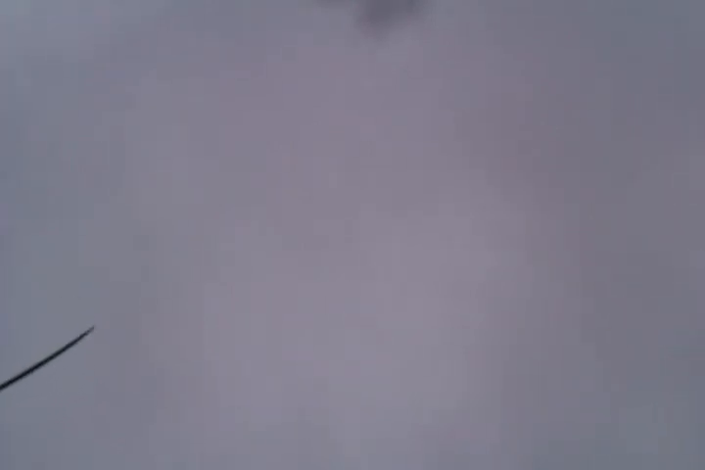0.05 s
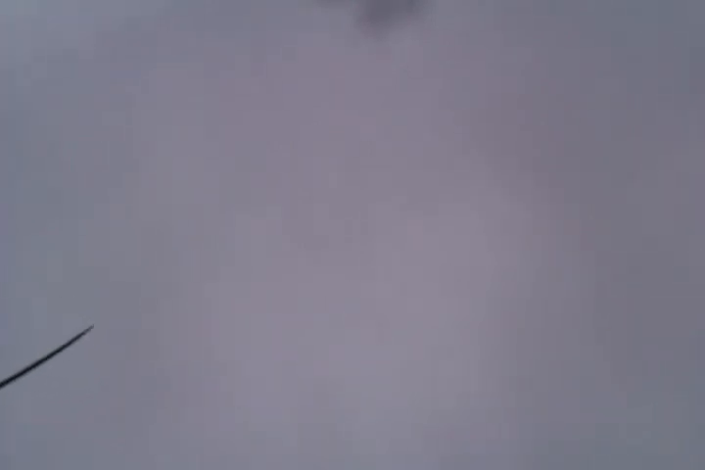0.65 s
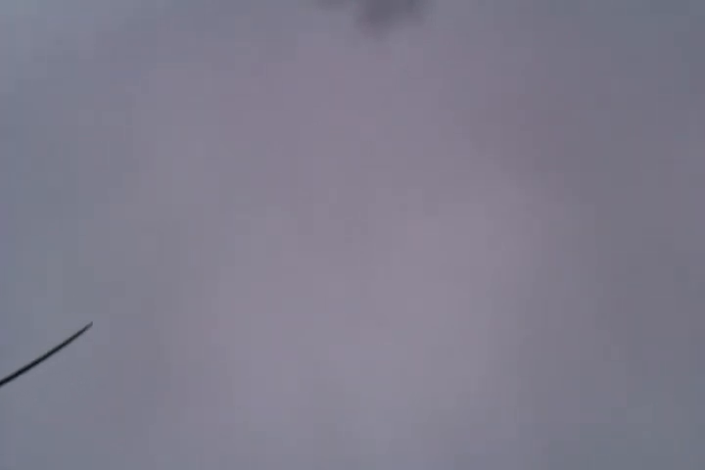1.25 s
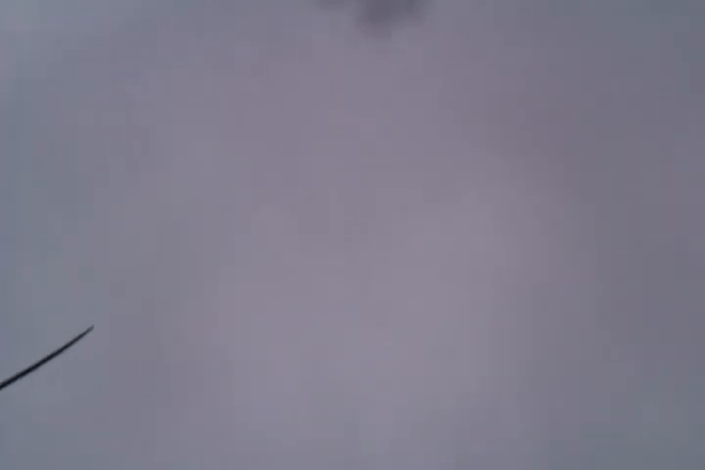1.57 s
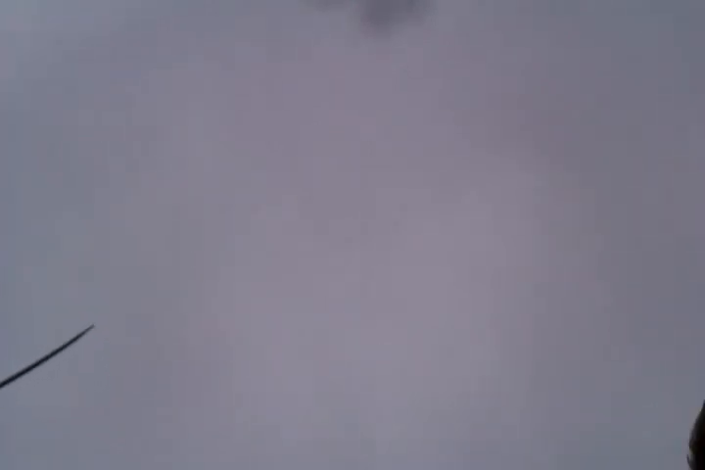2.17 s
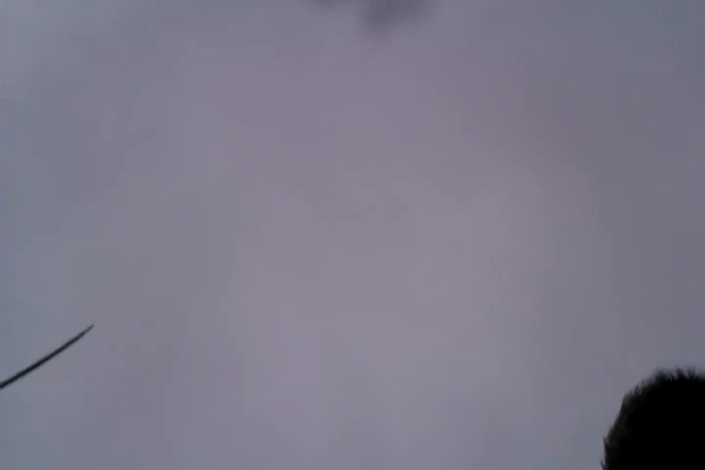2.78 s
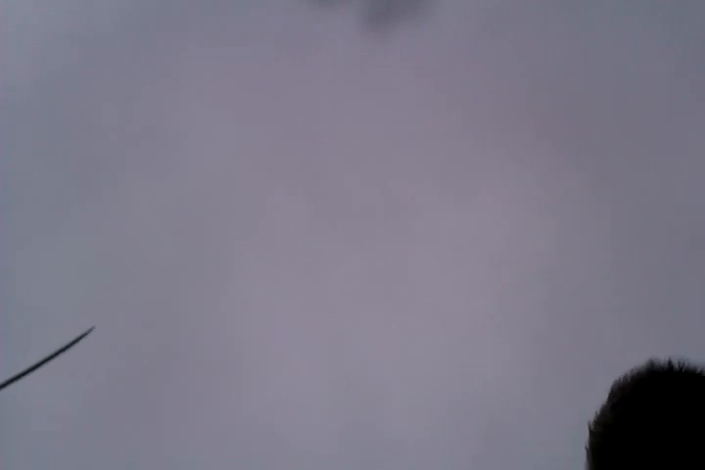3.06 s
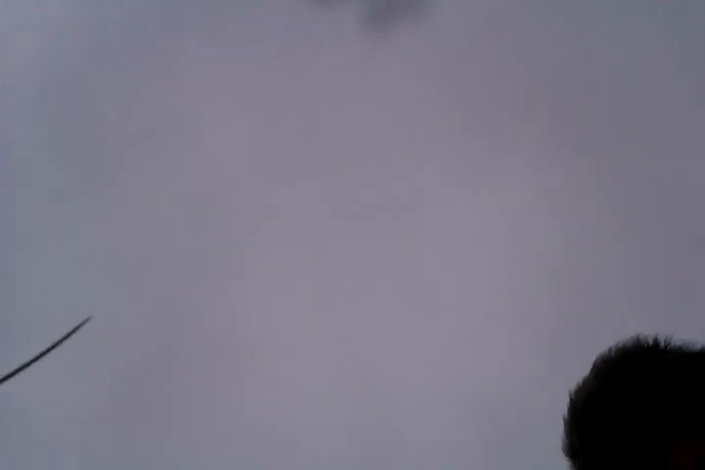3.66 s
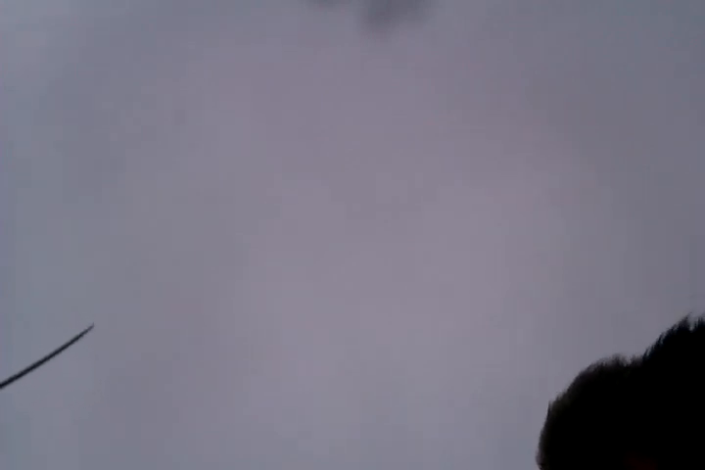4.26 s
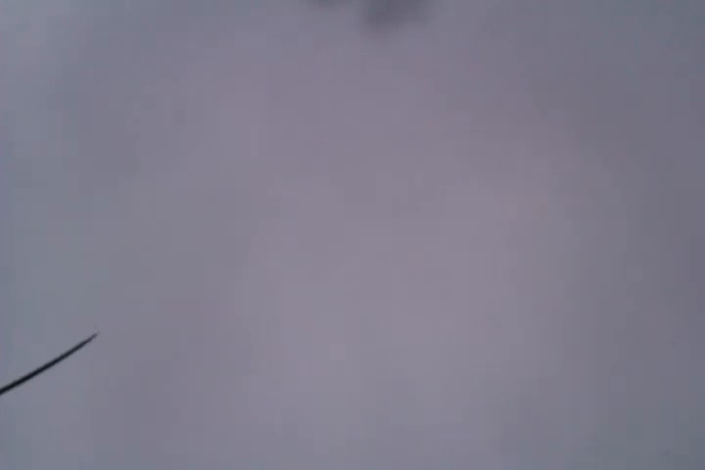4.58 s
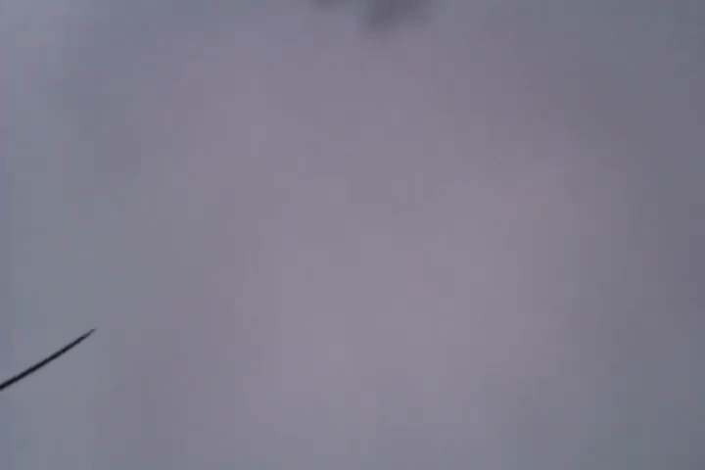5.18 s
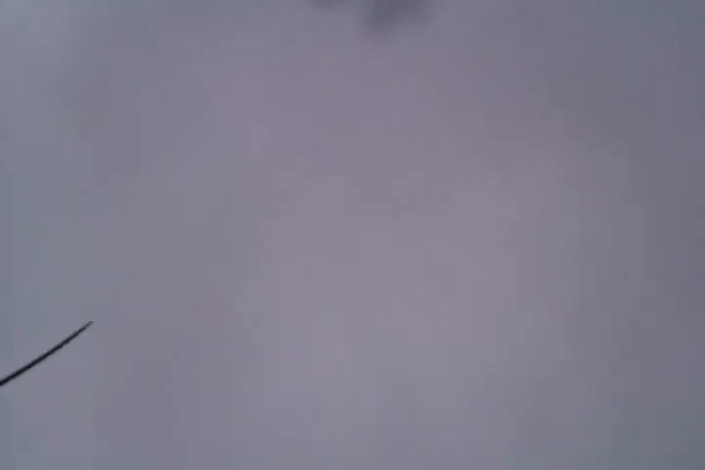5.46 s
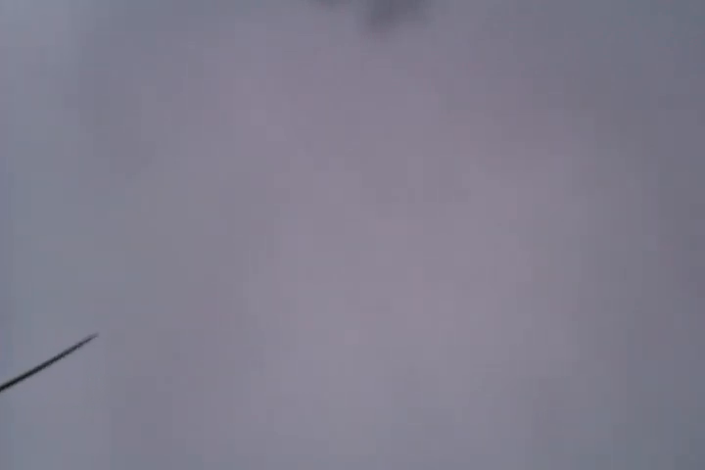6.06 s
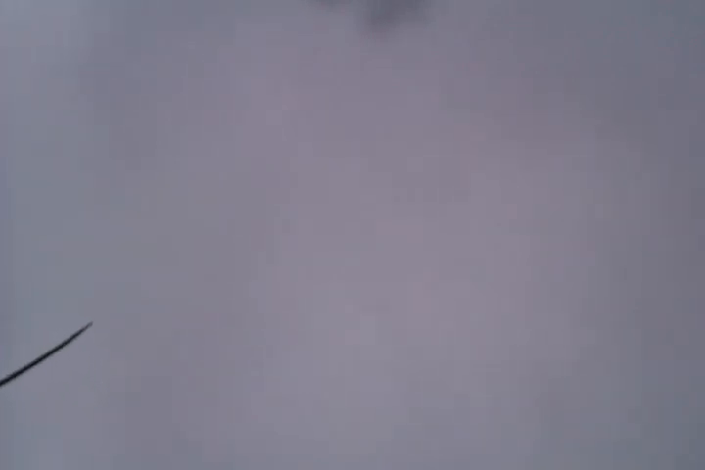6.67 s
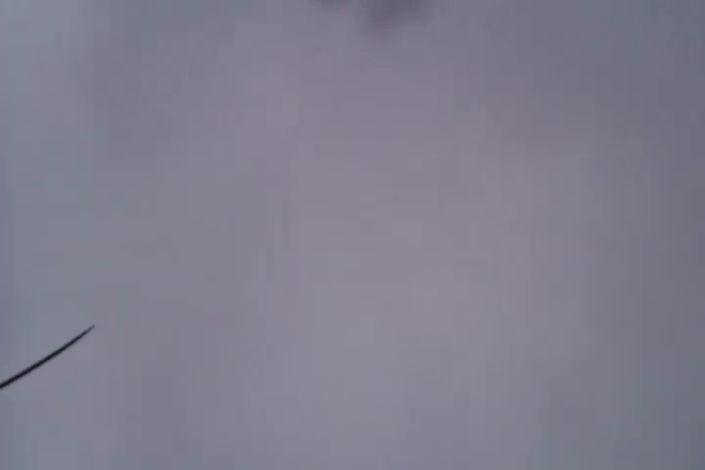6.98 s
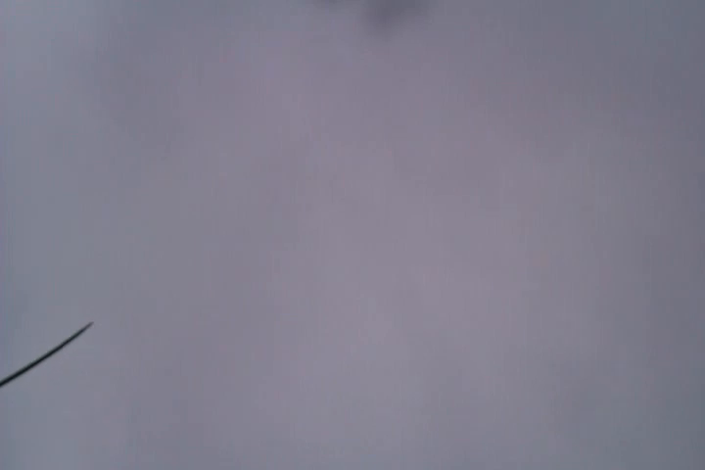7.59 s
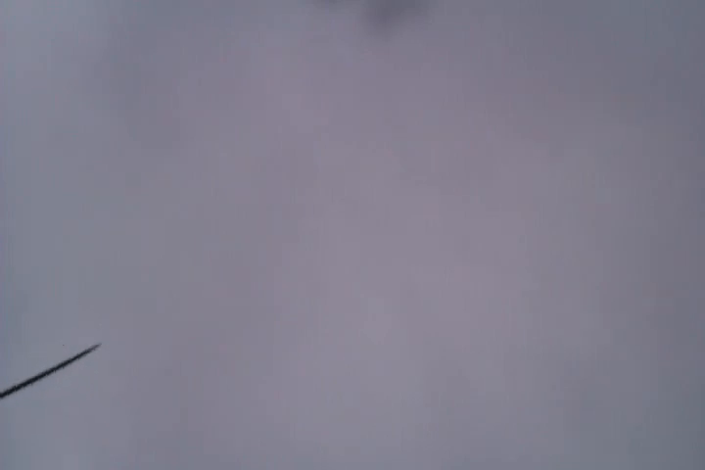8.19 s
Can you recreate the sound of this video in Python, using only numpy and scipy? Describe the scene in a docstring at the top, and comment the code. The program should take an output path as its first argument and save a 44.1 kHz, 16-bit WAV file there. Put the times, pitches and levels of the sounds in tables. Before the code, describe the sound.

A run of ten shrill, raspy animal screeches sounds very near the microphone in the open air, slightly distorted and separated by soft gasps. Each scoops up in pitch, catches on whistling notes and ends hoarse. A hand bumps the microphone now and then. The cries weaken and stop, leaving faint hiss, knocks, scuffs and wind that swells at the end. The whole sound has a fast electronic buzz.

```python
"""Outdoors, an animal starts screeching at once, close enough to overload the microphone.
For six seconds it cries ten times, its thin 2 kHz voice flipping between a pure whistle and a
chaotic rasp, with small gasps in between. From the fourth cry on, a hand knocks the camera.
After the last cry come more knocks, then the grip rubs and the rumbling wind rises at the end.
All the way through, the recorder stutters, which lays a fast buzz over everything."""
import sys
import numpy as np
from scipy import signal
from scipy.fft import rfft, irfft, next_fast_len
from scipy.io import wavfile
from scipy.ndimage import uniform_filter1d

SR = 44100
rng = np.random.default_rng(int(sys.argv[2]) if len(sys.argv) > 2 else 0)


def generate_wav(signal):
    """Clip the signal to [-1, 1] and save it as 16-bit WAV at the path in sys.argv[1]."""
    frames = np.transpose(np.atleast_2d(signal))
    scaled = np.clip(frames, -1, 1) * 32767
    pcm = np.round(scaled).astype(np.int16)
    wavfile.write(sys.argv[1], SR, pcm)


N = 367794
TIME = np.arange(N) / SR


def screech(edges_hz=(3000, 5100), hold_s=.045, flutter_db=1.5, flutter_hz=35.7):
    """The animal's voice: vocal folds drive the throat, and its low, middle and top bands shift in weight."""
    hz, rough, effort_db, middle_db, top_db = squeals(cries())
    rough = np.clip(rough, 0, 1)
    voice = throat(vocal_folds(hz, rough), hz)
    lowpasses = [signal.butter(6, edge, fs=SR, output="sos") for edge in edges_hz]
    low, below_top = [signal.sosfiltfilt(lowpass, voice) for lowpass in lowpasses]
    bands = np.array([low, below_top - low, voice - below_top])
    # steady lung pressure holds each band's strength even while the cycles scatter
    power = uniform_filter1d(bands ** 2, int(hold_s * SR), axis=1)
    bands /= np.sqrt(abs(power) + 1e-9)
    # in the rasp the energy flutters from one band to another
    flutter = flutter_db * np.sqrt(rough) * np.array([drift(flutter_hz) for _ in bands])
    weights = from_db(np.array([np.zeros(N), middle_db, top_db]) + flutter)
    voice = (bands * weights).sum(0) / np.linalg.norm(weights, axis=0)
    return voice * from_db(effort_db)


# The ten cries. Roughness runs from 0 (whistle) to 1 (rasp); middle and top compare with the low band.
# start/s, end/s, effort/dB, growth/dB, late sag/dB, pitch/Hz, pitch rise/s, roughness, middle/dB, top/dB
CRIES = [(.069, .28, 0, 5, 20, 2397, 0.031, 0.64, -2, 0.5),
         (0.451, .939, -3.5, 3.5, 4, 2287, .028, 0.6, 1.5, 4.5),
         (1.1, 1.577, -2.5, 4, 11.5, 2184, .017, 0.37, -3.5, 1),
         (1.746, 2.236, -2, 3, 5, 2188, .018, 0.3984, -0.5, 4.5),
         (2.458, 3.028, -11, 0.5, -2.5, 2079, .042, .56, 0, 0),
         (3.2, 3.624, -5, 1.5, 5.5, 2137, 0.026, 0.41, -2.5, 1),
         (3.832, 4.312, -8, 1.5, 4, 2124, .07, .5, -2, 2.5),
         (4.466, 4.802, -7, 2.5, 11, 2206, .045, .8, -5, 0),
         (5.117, 5.5, -15.5, 6, 8.5, 2218, .07, .6, -1, -0.5),
         (5.675, 6.069, -18, 4.5, 3.5, 2220, 0.069, 0.59, -2.5, -3)]
ONSET_HZ, ONSET_ROUGH = 1468.8, .65  # every cry starts low and hoarse


def cries(silent_db=-120):
    """Five curves that steer the voice: pitch, roughness, effort, middle band and top band."""
    controls = np.outer([ONSET_HZ, ONSET_ROUGH, silent_db, 0, 0], np.ones(N))
    for start, end, *manner in CRIES:
        part = slice(round(start * SR), round(end * SR))
        controls[:, part] = cry_shape(TIME[part] - start, end - start, *manner)
    return controls


def cry_shape(t, length, effort_db, growth_db, sag_db, pitch_hz, rise_s, rough, middle_db, top_db):
    """How those five curves move during one cry."""
    left, done = np.maximum(length - t, 0), np.clip(t / length, 0, 1)
    # the pitch scoops up from below and droops at the end
    droop_hz = 482.3 * np.exp(-left / .035)
    hz = pitch_hz + (ONSET_HZ - pitch_hz) * np.exp(-t / rise_s) - droop_hz
    # the hoarse start steadies, then breaks into pure rasp as the air runs out
    rough = rough + (ONSET_ROUGH - rough) * np.exp(-t / .02) + (1 - rough) * done ** 3.205
    # the cry snaps on, swells, sags and is cut short
    opening = 18 * np.maximum(1 - t / .013, 0) + 13 * np.exp(-t / .036)
    sag = sag_db * np.exp(-left / .082)
    release = 30 * np.maximum(1 - left / .027, 0)
    effort = effort_db + growth_db * (done - .5) - opening - sag - release
    # it opens thin, fills out in the middle band, and dulls as it sags
    middle = middle_db - 5 * np.exp(-t / .06) + 3 * (done - .5)
    top = top_db - .25 * sag
    return hz, rough, effort, middle, top


# Moments within a cry when the voice locks on to a note.
# start/s, end/s, first pitch/Hz, last pitch/Hz, roughness, extra effort/dB, middle/dB, top/dB
SQUEALS = [(.083, .135, 1958, 2170, 0.18, 0, 0.5, 2), (.183, 0.233, 2328, 2170, 0.15, 2.5, -12.5, -1.5),
           (.485, 0.533, 2067, 2120, .5, -1.5, -0.5, 2), (0.539, .645, 1855, 1860, 0.41, -0.5, 7.5, 5.5),
           (.655, 0.734, 2061, 2350, .22, -1, -2, 1.5), (1.113, 1.145, 2057, 2080, 0.29, 0.5, -3, -0.5),
           (1.152, 1.205, 1970, 1940, 0.21, -1.5, 3, 0.5), (1.216, 1.311, 2035, 2165, 0.16, 0.4, 0.5, 2.5),
           (1.316, 1.345, 2220, 2190, 0.16, 3.5, -10.5, 0), (1.383, 1.428, 2240, 2300, 0.2, 3.5, -9.5, 0),
           (1.439, 1.52, 2153, 2200, .36, 4.5, -0.5, 8), (1.765, 1.82, 2060, 2020, .28, 1, -1.5, 0.5),
           (1.831, 1.912, 2170, 2222, 0.07, 4, -1, 5), (1.916, 1.952, 2143, 2225, 0.32, 1, -2.5, 5),
           (1.956, 2.045, 2255, 2275, .02, 1.5, -19, 0), (2.102, 2.176, 2278, 2215, 0.04, 0, -21, 0),
           (2.6, 2.66, 1953, 1960, 0.61, -3, 2, -3.5), (2.716, 2.786, 1977, 2042, .17, -1.5, -1, 0),
           (2.79, 2.85, 2065, 2190, .15, 3, -5, 3), (2.855, 2.918, 1940, 1790, 0.18, 7, 7, 8.5),
           (3.235, 3.28, 1977, 2030, 0.43, 0.5, -3.5, 1), (3.287, 3.384, 2168, 2165, 0.18, 1.5, -5, -1.5),
           (3.387, 3.414, 2106, 2090, 0.39, 0, 1, 3.5), (3.42, 3.503, 2252, 2244, 0.02, 3.5, -20.5, -3),
           (3.509, 3.548, 1940, 1980, .6, 3.5, 2.5, 6.5), (3.957, 4.05, 2016, 2030, 0.09, 1.5, 4.5, 3),
           (4.125, 4.194, 2060, 2110, 0.28, -1, 0.5, 4.5), (4.2, 4.261, 2110, 2140, .7, 4, 1.5, 7),
           (4.52, 4.582, 2234, 2200, .62, 2.5, -1, 3.5), (4.589, 4.65, 1900, 1820, .52, 1, 1.5, 4)]


def squeals(controls, flip_s=.012, arch=.2):
    """The voice flips quickly on to a note, glides along a slight upward bow, and flips back."""
    for start, end, first_hz, last_hz, rough, extra_db, middle_db, top_db in SQUEALS:
        part = slice(round((start - flip_s) * SR), round((end + flip_s) * SR))
        t, free = TIME[part], controls[:, part]
        lock = np.clip(.5 + np.minimum(t - start, end - t) / flip_s, 0, 1)
        done = np.clip((t - start) / (end - start), 0, 1)
        glide = last_hz - first_hz
        note = first_hz + glide * done + arch * abs(glide) * np.sin(np.pi * done)
        locked = np.array(np.broadcast_arrays(note, rough, free[2] + extra_db, middle_db, top_db))
        controls[:, part] = free + lock * (locked - free)
    return controls


def vocal_folds(hz, rough, jitter=.2, steady_jitter=.0024, fits_hz=25.15, wobble=.035, wobble_hz=108.3):
    """The folds snap shut once a cycle; fits of roughness shake pitch and timing and let air through."""
    rough = np.clip(rough * np.exp(.4 * drift(fits_hz)), 0, 1)
    hz = hz * (1 + wobble * np.minimum(2 * rough, 1) * drift(wobble_hz))
    turns = np.cumsum(hz) / SR
    cycle = np.arange(int(turns[-1]))
    chaos = np.interp(cycle, turns, rough)
    late, strong = rng.standard_normal((len(cycle), 2)).T
    slip = np.cumsum((steady_jitter + jitter * chaos ** 1.253) * late)
    shut_at = np.interp(cycle + slip, turns, np.arange(N))
    size = 1 + chaos * (1 - chaos) * strong  # half-broken cycles close unevenly
    # each snap is spread over 14 samples, so its exact moment can fall between two
    taps = shut_at.astype(int)[:, None] + np.arange(-6, 8)
    offset = taps - shut_at[:, None]
    snaps = size[:, None] * np.sinc(offset) * np.cos(np.pi * offset / 14) ** 2
    pulses = np.bincount(np.clip(taps, 0, N - 1).ravel(), snaps.ravel(), N) - hz / SR
    breath = rough ** .38 * rng.standard_normal(N)
    return breath - evened(pulses)


# How well the throat and open mouth pass each frequency: f/Hz, level/dB
THROAT = [(60, -37.5), (400, -22), (900, -33.5), (1300, -16), (1750, -10), (2200, -1.5), (3050, -4),
          (3900, 2), (4950, -5), (6200, -2.5), (7400, -4), (8600, -12), (10000, -20), (16000, -30)]


def throat(source, hz, open_hz=2016., ring=1.5, width_hz=370.):
    """The throat shapes the tone; while the mouth is half shut, a low ringing follows the pitch."""
    shut = np.clip(1 - hz / open_hz, 0, 1)
    low_ring = evened(resonate(resonate(source, hz, width_hz), hz, width_hz))
    return colour(source, THROAT) + ring * shut * low_ring


# Breaths between the cries: t/s, length/s, level/dB, wheeze/Hz
GASPS = [(0.238, 0.17, -49, 1198), (0.365, 0.15, -47, 1542), (0.933, .065, -36, 1478),
         (1.571, .17, -52, 1395), (3.737, 0.065, -46, 1446), (4.406, 0.072, -43.5, 1247),
         (4.79, .13, -59, 1398), (5.051, 0.12, -42, 1976)]
# The tone of the rushing breath: f/Hz, level/dB
GASP_COLOUR = [(100, -23.5), (900, -6), (1500, 1), (2300, -1), (3100, -1.5), (4500, -5), (6300, -4.5),
               (9000, -14), (16000, -32.5)]


def gasps(wheeze=.9, waver=.021, overtone=.35):
    """Short soft draws of air through a narrow throat that wheezes."""
    out, air = np.zeros(N), noise(GASP_COLOUR)
    wavering_time = np.cumsum(1 + waver * drift(120)) / SR
    for start, length, db, hz in GASPS:
        part = slice(round(start * SR), round((start + length) * SR))
        angle = 2 * np.pi * hz * wavering_time[part]
        draw = air[part] + wheeze * (np.sin(angle) + overtone * np.sin(2 * angle))
        add(out, start, from_db(db) * draw * signal.windows.tukey(len(draw), .7))
    return out


# The hand bumps the camera: t/s, level/dB, f/Hz
KNOCKS = [(1.718, -29.5, 299.6), (2.299, -25.5, 324.2), (3.7497, -15.5, 287.2), (3.761, -18.5, 280),
          (3.7703, -18.5, 279.5), (4.819, -25, 345.8), (4.835, -28, 296.5), (6.092, -30, 400.8),
          (6.103, -38, 250.3), (6.329, -32.5, 325.4), (6.63, -35, 330), (6.666, -26.5, 331),
          (6.862, -26, 330), (7.149, -37, 398), (7.372, -23, 161), (7.396, -42, 150)]


def knocks(ring_s=.0039, thud_db=-11., thud_s=.0072, rise_s=.0004):
    """Each knock swings the camera body for a cycle or two, with a dull thud."""
    out, t = np.zeros(N), np.arange(SR // 10) / SR
    for start, db, hz in KNOCKS:
        swing = np.sin(2 * np.pi * hz * t) * np.exp(-t / ring_s)
        thud = noise([(50, -6), (500, 28.5), (1200, -19), (4000, -56), (16000, -37)], len(t))
        blow = swing + from_db(thud_db) * thud * np.exp(-t / thud_s)
        add(out, start, from_db(db) * blow * (1 - np.exp(-t / rise_s)))
    return out


# The hand rubs on the camera: t/s, level/dB, fade/s
RUBS = [(7.303, -37, 0.011), (7.355, -27, 0.017), (7.38, -29, 0.029), (7.445, -40, 0.021),
        (8.182, -41, 0.013), (8.303, -31, 0.022)]
# The tone of the rubbing: f/Hz, level/dB
RUB_COLOUR = [(20, 6.5), (60, -3), (170, -1), (300, -10), (700, -33), (1500, -24), (2600, -32),
              (16000, -49)]


def rubs(rise_s=.0072):
    """The grip shifts: dull scuffs with a rustling edge."""
    loudness, t = np.zeros(N), np.arange(SR // 4) / SR
    for start, db, fade_s in RUBS:
        add(loudness, start, from_db(db) * (1 - np.exp(-t / rise_s)) * np.exp(-t / fade_s))
    return loudness * noise(RUB_COLOUR)


# Small sharp ticks: t/s, level/dB, fade/s
TICKS = [(5.615, -39, 0.0063), (7.865, -35, 0.0013), (8.003, -45, 0.0018)]


def ticks():
    """Handling the camera makes tiny bright snaps."""
    out, t = np.zeros(N), np.arange(SR // 10) / SR
    for start, db, fade_s in TICKS:
        snap = noise([(2000, -24), (6500, 9), (12000, -14)], len(t))
        add(out, start, from_db(db) * snap * np.exp(-t / fade_s))
    return out


def scatter(x, level_db=-40., fade_60db_s=.61):
    """Ground and leaves throw back a faint bright echo."""
    t = np.arange(SR) / SR
    tail = noise([(500, -3.5), (2200, -1.5), (4000, 2), (6500, -9.5), (16000, 1.5)], SR)
    tail *= from_db(-60 * t / fade_60db_s)
    return from_db(level_db) * signal.fftconvolve(x, tail / np.linalg.norm(tail))[:N]


# How strongly the wind blows: t/s, level/dB
WIND = [(0, -50.5), (3, -52.5), (6.2, -54.5), (7.1, -54), (7.25, -51.5), (7.4, -41.5), (7.55, -57),
        (7.8, -49), (8.1, -44), (8.2, -41.5), (8.34, -35)]
# The tone of its rumble: f/Hz, level/dB
WIND_COLOUR = [(5, -2), (25, -0.5), (55, -3.5), (110, -9.5), (300, -24.5), (800, -40), (3000, -52.5),
               (16000, -58)]


def wind(gust_db=.5, gust_hz=15.):
    """Wind hits the microphone and makes a low, lumpy rumble."""
    return noise(WIND_COLOUR) * from_db(curve(WIND) + gust_db * drift(gust_hz))


# The tone of the open air: f/Hz, level/dB
AIR_COLOUR = [(20, -2.5), (120, -1.5), (400, -7), (900, -14), (2000, -19.5), (4500, -22.5), (7000, -25.5),
              (11000, -29), (16000, -30)]


def open_air(level_db=-53, swell_db=1.5, swell_hz=3.5):
    """A quiet bed of outdoor noise that gently swells and sinks."""
    return noise(AIR_COLOUR) * from_db(level_db + swell_db * drift(swell_hz))


# How loud the hiss is: t/s, level/dB
HISS = [(0, -55), (4.9, -57), (6.25, -59.5), (6.4, -66), (6.55, -57), (6.75, -68), (7.02, -63), (7.08, -49),
        (7.12, -72), (7.35, -63), (7.7, -67), (7.98, -66.5), (8.05, -58), (8.2, -63.5)]
# Its tone: f/Hz, level/dB
HISS_COLOUR = [(3000, -32.5), (5000, -4), (6300, -1.5), (7300, -7), (9500, -21.5), (16000, -43)]


def hiss():
    """A faint high hiss that comes and goes."""
    return noise(HISS_COLOUR) * from_db(curve(HISS))


def from_db(db):
    """Turns decibels into a number to multiply by."""
    return 10 ** (np.asarray(db) / 20)


def evened(x):
    """Scales a sound to an average power of 1."""
    return x / np.sqrt(np.mean(x ** 2) + 1e-20)


def curve(points):
    """Joins (time, value) points with straight lines."""
    return np.interp(TIME, *np.transpose(points))


def colour(x, points):
    """Shapes a sound's tone by (f/Hz, level/dB) points, then scales it to power 1."""
    size = next_fast_len(len(x))
    hz, db = np.transpose(points)
    bins_hz = np.fft.rfftfreq(size, 1 / SR)
    gain = from_db(np.interp(np.log(bins_hz + 1), np.log(hz + 1), db))
    return evened(irfft(rfft(x, size) * gain, size)[:len(x)])


def noise(points, samples=N):
    """Random noise with the given tone."""
    return colour(rng.standard_normal(samples), points)


def drift(top_hz):
    """Smooth random wandering, at rates up to about top_hz."""
    return noise([(top_hz, 0), (2 * top_hz, -20), (10 * top_hz, -100)])


def resonate(x, hz, width_hz):
    """Makes a sound ring around the moving pitch hz."""
    turn = np.exp(2j * np.pi * np.cumsum(hz) / SR)
    decay = np.exp(-np.pi * width_hz / SR)
    return 2 * (turn * signal.lfilter([1 - decay], [1, -decay], x / turn)).real


def add(mix, start_s, sound):
    """Lays a sound into the mix at the given time."""
    part = mix[round(start_s * SR):][:len(sound)]
    part += sound[:len(part)]


def scene():
    """Everything reaches one microphone, so left and right are the same."""
    voice = screech()
    mix = voice + scatter(voice) + gasps() + knocks() + ticks() + rubs() + open_air() + hiss() + wind()
    return np.array([mix, mix])


def record(dry, ceiling=.7, lean=.048, bass_hz=7., treble_hz=15750, block=192):
    """The microphone overloads lopsidedly, the recorder stutters, and the extreme lows and highs go."""
    x = ceiling * (np.tanh(dry / ceiling + lean) - np.tanh(lean))
    x = signal.sosfilt(signal.butter(1, bass_hz, "highpass", fs=SR, output="sos"), x)
    # a quarter of every block of samples comes three blocks early, which makes a 230 Hz buzz
    n = np.arange(N)
    early = (n - 152) % block < block // 4
    x = x[:, np.minimum(n + 3 * block * early, N - 1)]
    lowpass = signal.firwin(511, treble_hz, window=("kaiser", 9), fs=SR)
    return signal.oaconvolve(x, lowpass[None], "same", axes=1)


dry = scene()
out = record(dry)
generate_wav(out)
```